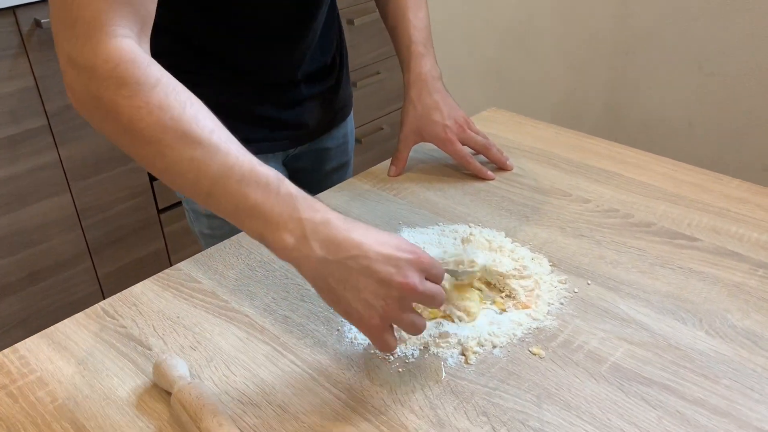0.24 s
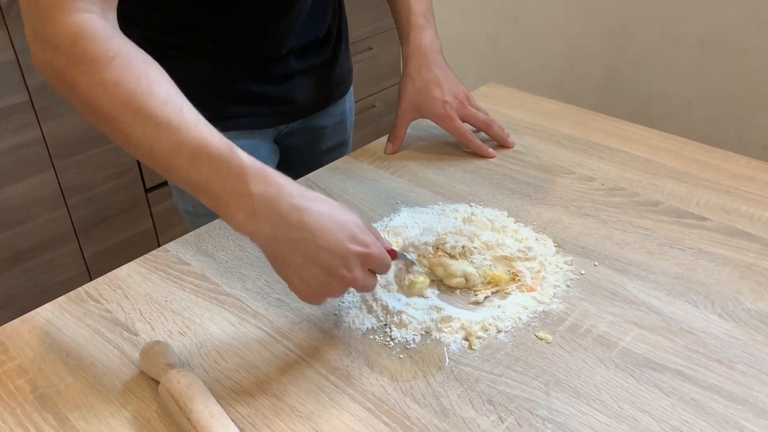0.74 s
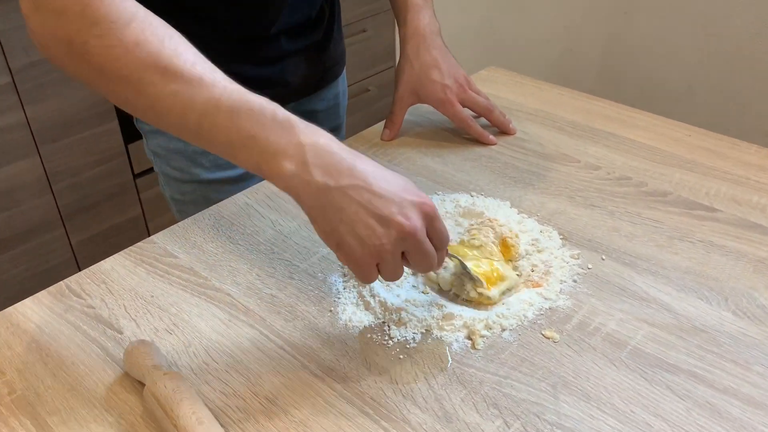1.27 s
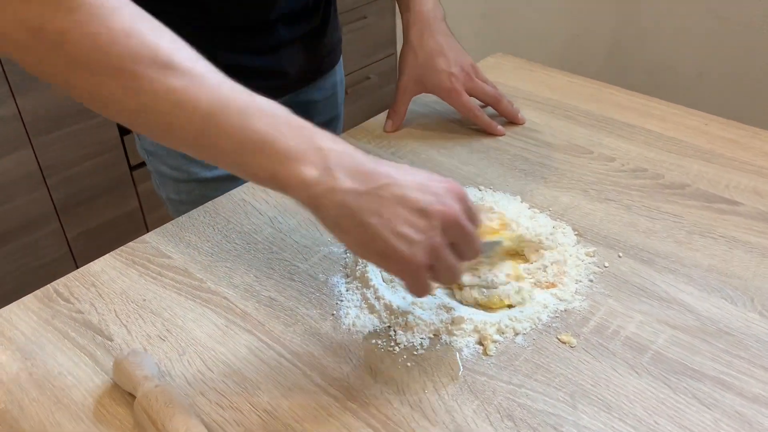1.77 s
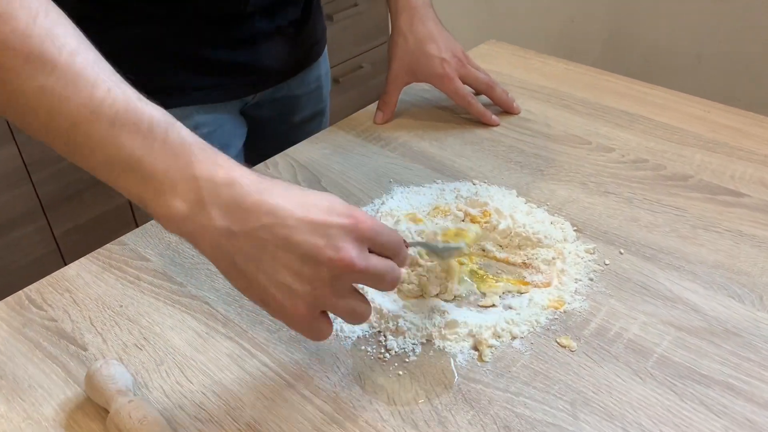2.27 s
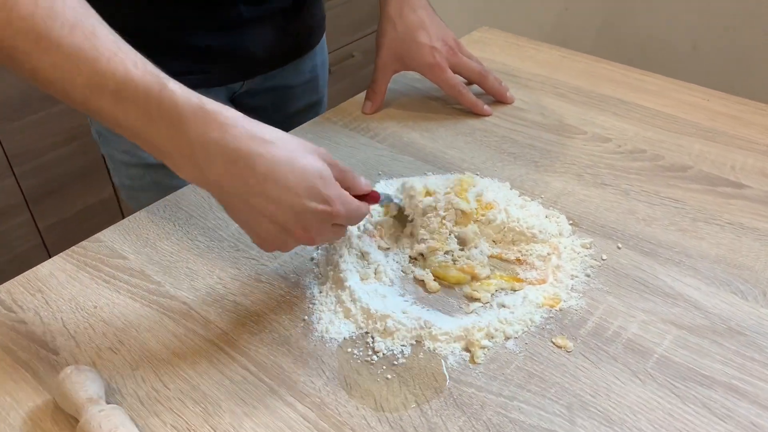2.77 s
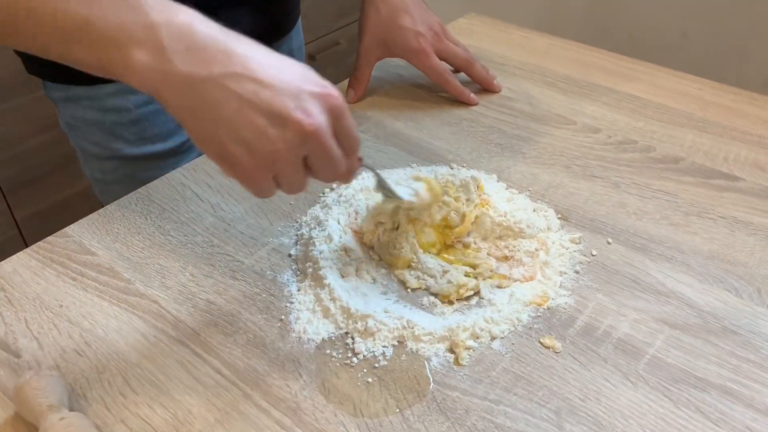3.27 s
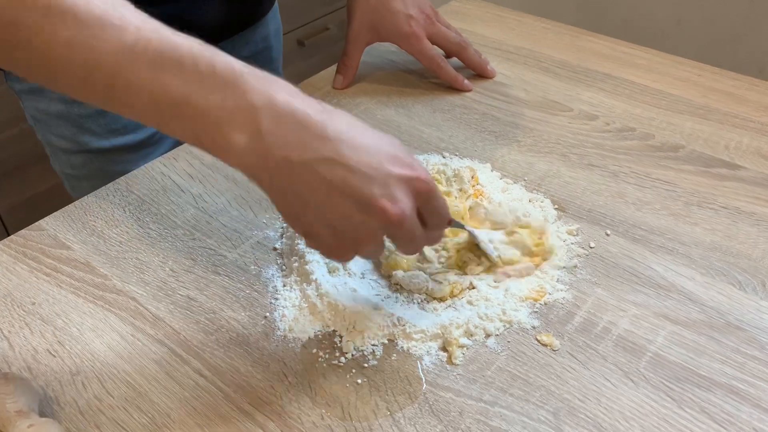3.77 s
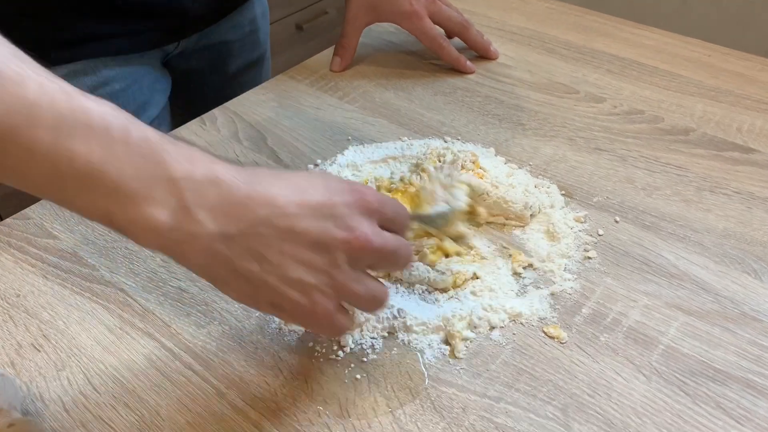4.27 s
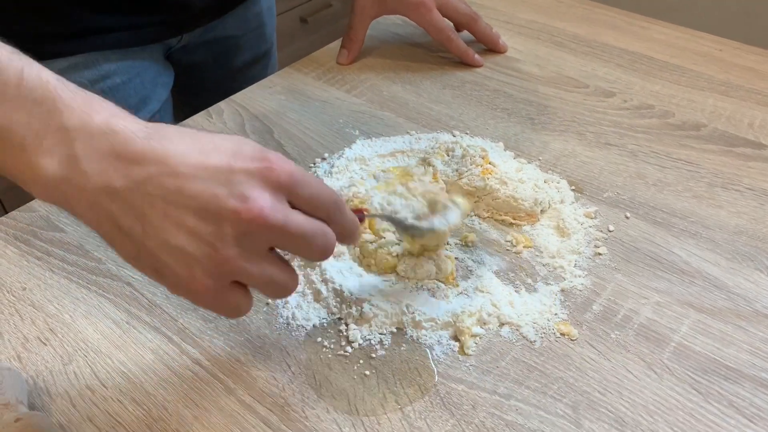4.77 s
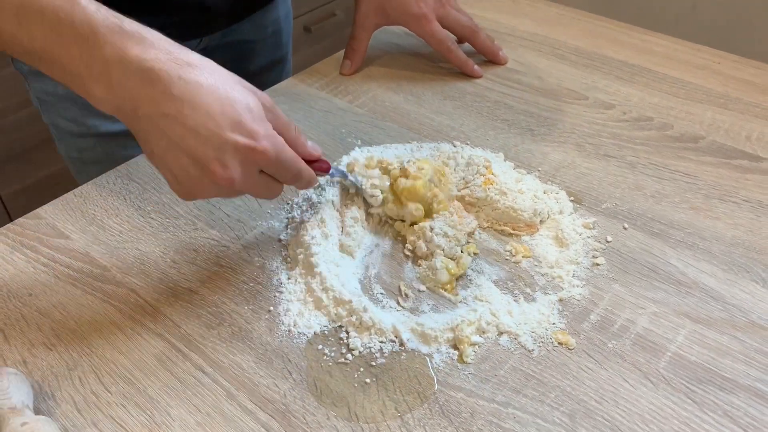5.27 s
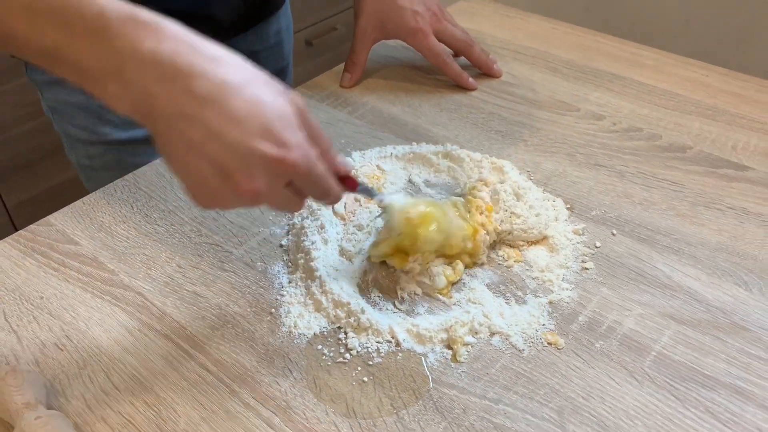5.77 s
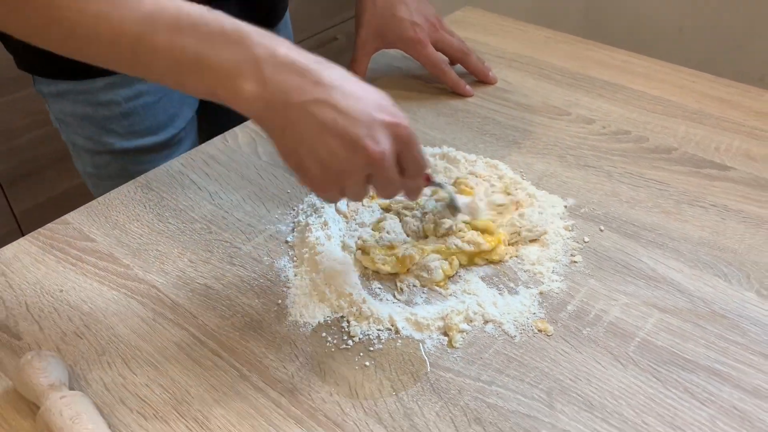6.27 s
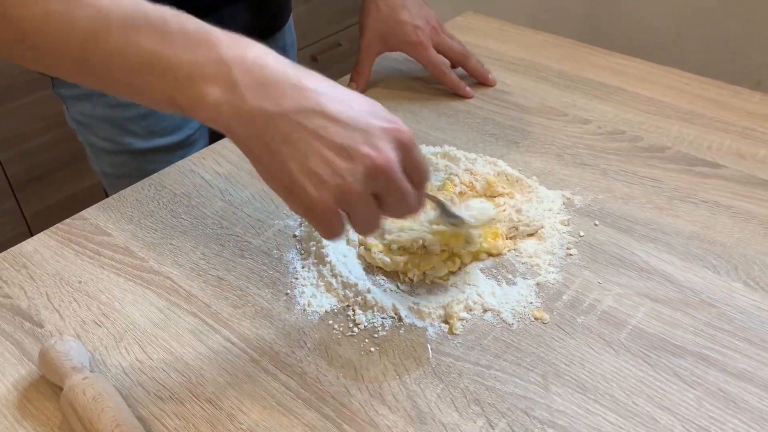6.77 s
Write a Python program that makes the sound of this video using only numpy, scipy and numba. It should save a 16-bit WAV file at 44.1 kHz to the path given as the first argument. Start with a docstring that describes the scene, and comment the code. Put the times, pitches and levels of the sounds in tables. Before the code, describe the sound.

A fork stirs sticky egg and flour on a wooden table, with irregular knocks, gritty scrapes and small wet smacks over low traffic rumble.

```python
"""In a small, bare kitchen a fork stirs eggs into flour on a wooden table.
Most strokes begin with a knock that rings the modes of the table top and the fork's neck, with a short dry crack.
Then the tines drag over gritty wood, or the neck rings on: stick-slip clicks drive rasp, tines, grit and table.
Crumb ticks, smacks, small tine hits and the slosh of sticky dough are shaped noise.
Bands of distant traffic rumble over the hiss of a two-port recorder."""
import sys
import numpy as np
from scipy import signal
from scipy.fft import rfft, irfft, next_fast_len
from scipy.io import wavfile
from scipy.ndimage import uniform_filter1d
from numba import njit

SR = 44100
rng = np.random.default_rng(int(sys.argv[2]) if len(sys.argv) > 2 else 0)


def generate_wav(sig):
    """Save sig (samples, or channels by samples) to the path in sys.argv[1] as 16-bit PCM at SR."""
    pcm = np.round(np.clip(np.atleast_2d(sig).T, -1, 1) * 32767).astype(np.int16)
    wavfile.write(sys.argv[1], SR, pcm)


N = 310287


def from_db(db):
    """Decibel law: level in dB to amplitude gain."""
    return 10 ** (np.asarray(db) / 20)


def rms_one(x):
    """Energy normalisation: scales a signal to unit rms."""
    return x / np.sqrt(np.mean(x ** 2) + 1e-30)


def at_hz(points, hz, axis=1):
    """Logarithmic interpolation: reads one column of a spectrum table on a log frequency axis."""
    points = np.array(points)
    return np.interp(np.log(hz + 1), np.log(points[:, 0]), points[:, axis])


def colour(x, spectrum):
    """Spectral shaping: weights each frequency by a table of relative dB per Hz; rms 1."""
    size = next_fast_len(N)
    gain = from_db(at_hz(spectrum, np.fft.rfftfreq(size, 1 / SR)))
    return rms_one(irfft(rfft(x, size) * gain, size)[..., :N])


def drift(rate):
    """Low-passed noise: two poles at the rate in Hz leave a slow random wander of rms 1."""
    r = np.exp(-2 * np.pi * rate / SR)
    wander = signal.lfilter([1], [1, -2 * r, r * r], rng.standard_normal(N + SR))
    return rms_one(wander[SR:])     # the first second lets the filter settle


def resonance(x, hz, width_hz):
    """Damped resonator: a two-pole band-pass of peak gain 1."""
    r = np.exp(-np.pi * width_hz / SR)
    poles = [1, -2 * r * np.cos(2 * np.pi * hz / SR), r * r]
    return signal.lfilter([(1 - r * r) / 2, 0, (r * r - 1) / 2], poles, x)


@njit
def gliding(x, cosine, r):
    """Time-varying resonator: a two-pole band-pass whose centre moves."""
    y = np.zeros(len(x))
    for i in range(2, len(x)):
        y[i] = x[i] - x[i - 2] + 2 * r * cosine[i] * y[i - 1] - r * r * y[i - 2]
    return y


def moving_band(x, hz, width_hz):
    """Cascaded resonance: two passes through a gliding resonator steepen the band; rms 1."""
    cosine = np.cos(2 * np.pi * hz / SR)
    r = np.exp(-np.pi * width_hz / SR)
    return rms_one(gliding(gliding(x, cosine, r), cosine, r))


def ring(clicks, hz, t60):
    """Modal impulse response: a unit click starts a decaying sine of height 1."""
    r, w = from_db(-60 / (t60 * SR)), 2 * np.pi * hz / SR
    return signal.lfilter([0, np.sin(w)], [1, -2 * r * np.cos(w), r * r], clicks + 1e-18)


def clicks_at(per_s, spread_db):
    """Random point process: clicks of either sign and uneven size at an average rate per second."""
    sizes = from_db(spread_db * np.minimum(rng.exponential(1, N), 5)) * rng.choice([-1, 1], N)
    return sizes * (rng.random(N) < per_s / SR)


# Likeness of the two ports in the diffuse sound. Each row: frequency in Hz, left-right correlation.
PORT_LIKENESS = [(60, 1), (300, 0.8), (700, 0.36), (1200, 0.012), (5000, .05), (6300, 0.16), (8500, 1),
                 (15000, 0.95)]


def alike_pair(mid, side, hz):
    """Partial coherence: a shared and an opposed part make left and right of a given correlation."""
    alike = np.clip(at_hz(PORT_LIKENESS, hz), 0, 1)
    return np.sqrt((1 + alike) / 2) * mid + np.sqrt((1 - alike) / 2) * side * [[1], [-1]]


# Still room and recorder hiss. Each row: frequency in Hz, relative level in dB per Hz.
FLOOR_SPECTRUM = [(25, -54), (40, 6), (60, -2), (100, -12.5), (200, -7.5), (500, -17), (1500, -25.5),
                  (2500, -33.5), (5000, -40.5), (8000, -35), (11500, -32.5), (12500, -39.5), (15800, -39)]
# Slow swells of traffic. Each row: time in seconds, deep rumble in dB, drone in dB.
TRAFFIC_SWELLS = [(0.0, -71, -78), (0.33, -59.5, -68), (1.61, -66.5, -80.5), (1.96, -61, -65.5),
                  (2.14, -64.5, -71), (3.12, -60, -71), (3.45, -58.5, -61.5), (4.31, -58, -66.5),
                  (4.43, -52.5, -81), (4.98, -59, -62), (5.25, -59, -65.5), (5.66, -63.5, -70),
                  (6.541, -63, -73), (6.88, -67.5, -74.5), (7.04, -61, -57)]
FLOOR_DB = -67
DEEP_HZ, DRONE_HZ = (73, 45), (138.6, 20.6)     # centre, width of each filter pass


def background():
    """Diffuse-field noise: a steady coloured floor, two swelling bands of traffic and house noise."""
    s, deep_db, drone_db = np.transpose(TRAFFIC_SWELLS)
    t, white = np.arange(N) / SR, rng.standard_normal((3, 2, N))
    out = from_db(FLOOR_DB) * colour(white[0], FLOOR_SPECTRUM)
    for noise, db, (hz, width_hz) in zip(white[1:], (deep_db, drone_db), (DEEP_HZ, DRONE_HZ)):
        band = resonance(resonance(noise, hz, width_hz), hz, width_hz)
        out += from_db(np.interp(t, s, db)) * rms_one(band)
    house = resonance(rng.standard_normal((2, N)), 490.0, 1200.)     # muffled house noise comes and goes
    out += from_db(-82 + 3.5 * drift(3.1)) * rms_one(house)
    size = next_fast_len(N)
    mid, side = rfft(out, size)
    return irfft(alike_pair(mid, side, np.fft.rfftfreq(size, 1 / SR)), size)[:, :N]


# Swells of a faint narrow hiss. Each row: start in seconds, end in seconds, peak level in dB.
WHEEZE_SWELLS = [(1.158, 1.453, -81), (1.55, 1.7, -83.5)]
WHEEZE_HZ = (2600, 248)     # centre, width of each filter pass


def wheeze():
    """Amplitude modulation: half-sine swells open and close a narrow band of noise."""
    t, hiss = np.arange(N) / SR, rng.standard_normal(N)
    swell = 0
    for start, end, db in WHEEZE_SWELLS:
        swell = swell + from_db(db) * np.sin(np.pi * np.clip((t - start) / (end - start), 0, 1))
    return swell * rms_one(resonance(resonance(hiss, *WHEEZE_HZ), *WHEEZE_HZ))


# The fork turns the soft paste over.
# Each row: time of the peak in seconds, slosh peak in dB, flour rustle peak in dB.
PASTE_TURNS = [(0.7, -89, -83), (1.25, -94, -83), (3.052, -71.5, -93), (3.29, -79, -104),
               (3.437, -71.5, -101), (3.87, -94, -77.5), (4.084, -75, -109), (4.17, -94, -87),
               (5.65, -81.5, -99), (5.971, -81, -78), (6.87, -88.5, -102.5)]
STIR_RISE_DB_PER_S, STIR_FALL_DB_PER_S, STIR_REST_DB = 220, 139, -92.5


def stir():
    """Granular excitation: sparse clicks give a lumpy slosh, denser ones a rustle of flour."""
    t, gains = np.arange(N) / SR, from_db(STIR_REST_DB)
    for s, *peak_db in PASTE_TURNS:
        loss_db = np.maximum(STIR_RISE_DB_PER_S * (s - t), STIR_FALL_DB_PER_S * (t - s))
        gains = gains + np.outer(from_db(peak_db), from_db(-loss_db))
    slosh = resonance(clicks_at(900., 0.7), 1060.0, 710.0)
    rustle = resonance(clicks_at(2500., 5.1), 2400.0, 2500.)
    return gains[0] * rms_one(slosh) + gains[1] * rms_one(rustle)


PUFF_RISE_SHARE = 0.075     # rise time constant as a share of t60


def puffs(events, sharpness, t60):
    """Transient band noise: each event is a dying puff in a band whose width is centre / sharpness."""
    out, age = np.zeros(N), np.arange(2000) / SR
    rise = 1 - np.exp(-age / (PUFF_RISE_SHARE * t60))
    for (s, level_db, hz), noise in zip(events, rng.standard_normal((len(events), 2000))):
        band = resonance(resonance(noise, hz, hz / sharpness), hz, hz / sharpness)
        start = round(s * SR)
        out[start:start + 2000] += rms_one(band) * from_db(level_db - 60 * age / t60) * rise
    return out


# The three tables below share their columns; levels are before the rise and decay.
# Lumps of paste flop over. Each row: start in seconds, level in dB, centre in Hz.
PASTE_LUMPS = [(0.976, -71, 400), (1.044, -63, 1080), (3.166, -63, 430), (4.069, -58, 580),
               (5.859, -57, 340), (6.759, -60, 415)]
# Dry crumbs tick. Each row: start in seconds, level in dB, centre in Hz.
CRUMB_TICKS = [(0.19, -65, 11200), (1.0744, -65, 11800), (1.263, -44, 11600), (1.3435, -49, 10900),
               (3.2051, -60, 10700), (3.436, -49.5, 7100), (3.5367, -58, 11300), (3.7579, -63, 11200),
               (4.4302, -37.5, 11700), (4.4594, -62, 10300), (5.6077, -55, 6070), (5.964, -56, 9900),
               (6.024, -63, 11400), (6.2856, -59, 9950), (6.321, -57.5, 11000), (6.6052, -70, 6440)]
# Short mid-pitched smacks and tine hits. Each row: start in seconds, level in dB, centre in Hz.
SHORT_SMACKS = [(3.047, -50.5, 1110), (3.0694, -55, 1050), (3.2056, -50, 2830), (3.2675, -49, 1920),
                (3.2999, -55, 2000), (3.4336, -39, 1830), (3.4421, -39.5, 1750), (3.5044, -51.5, 1950),
                (3.7968, -53.5, 1310), (3.8975, -35, 2750), (3.9015, -53, 1910), (4.2194, -36.5, 1100),
                (5.6094, -80, 2020), (6.0038, -58.5, 2430), (6.0644, -54, 1220)]
TICK_T60_S, SMACK_T60_S, LUMP_T60_S = 0.017, 0.017, 0.11


def small_sounds():
    """Superposition: lumps, crumbs, short smacks and tine hits add to the slosh of the paste."""
    lumps = puffs(PASTE_LUMPS, 1.5, LUMP_T60_S)
    crumbs = puffs(CRUMB_TICKS, 1.0, TICK_T60_S)
    smacks = puffs(SHORT_SMACKS, 1.38, SMACK_T60_S)
    return smacks + crumbs + lumps + stir()


# Tines land on the table. Each row: time in seconds, thump level in dB, hardness in dB per octave
# about 300 Hz, relative fork ring in dB, crack onset level in dB.
TINE_LANDINGS = [(0.129, -38.5, 1.5, -55, -40.5), (1.733, -26, 6, -50, -43), (2.112, -44, -3, -42, -41),
                 (2.432, -36.5, 0.5, -50.5, -42), (4.196, -45, 3.5, -52, -40),
                 (4.554, -29.5, 5, -95, -43.5), (4.925, -42.5, -7.5, -50, -43),
                 (6.908, -27, 0.5, -34.5, -58)]
# Modes of the table top, the upper ones also rubbed by the fork.
# Each row: frequency in Hz, relative level in dB, free decay t60 in seconds.
TABLE_MODES = [(74, -1.5, 0.32), (127, -2, 0.49), (167.5, 6, 0.31), (216, 5, 0.11), (270.8, -0.5, 0.092),
               (329.6, 4, 0.27), (397, -7.5, 0.084), (432.4, -6, 0.14), (550, -4, 0.089), (650, -13, 0.073),
               (704, -13, 0.12), (840, -15, 0.081), (942, -10, 0.13), (1140, -30.5, 0.09),
               (1250, -24, 0.039), (1704, -27, 0.069)]
# Modes of the fork's neck, also shaken by the rasp.
# Each row: frequency in Hz, relative level in dB, t60 in seconds.
NECK_MODES = [(1394, -1, 0.35), (1397, -7.5, 0.14), (1550, -2.5, 0.48)]
WAVE_START_HZ, WAVE_SAG_S, WAVE_RISE_S, WAVE_T60_S = 400.4, 0.0218, .003, 0.089
WAVE_DB, MODES_DB = 2, -13.5     # bending wave and table modes against the thump level
CRACK_T60_S = 0.0035


def knocks():
    """Modal excitation by impact: a soft blow rings table and neck, with a dry crack of the steel."""
    s, thump_db, hardness, fork_db, crack_db = np.transpose(TINE_LANDINGS)
    at, out = np.round(s * SR).astype(int), np.zeros(N)
    scatter = rng.normal(0, 1, (len(at), len(TABLE_MODES) + len(NECK_MODES)))
    for k, (hz, level_db, t60) in enumerate(TABLE_MODES):
        clicks = np.zeros(N)
        late = round(SR * 0.06 / np.sqrt(hz))     # low bending waves travel slower
        strike_db = thump_db + level_db + MODES_DB + hardness * np.log2(hz / 300)
        clicks[at + late] = from_db(strike_db + 2 * scatter[:, k])
        out += ring(clicks, hz, t60) * (-1) ** k
    for k, (hz, level_db, t60) in enumerate(NECK_MODES):
        clicks = np.zeros(N)
        clicks[at] = from_db(fork_db + level_db - 3.5 + 3.9 * scatter[:, -1 - k])
        out += ring(clicks, hz, t60)
    out = signal.lfilter(np.hanning(26) / 13, [1], out)     # flour cushions the contact

    # the first bending wave sweeps past, falling in pitch
    age = np.arange(2000) / SR
    turns = WAVE_START_HZ * WAVE_SAG_S * age / (age + WAVE_SAG_S)
    envelope = (1 - np.exp(-age / WAVE_RISE_S)) * from_db(WAVE_DB - 60 * age / WAVE_T60_S)
    wave = np.sin(2 * np.pi * turns) * envelope
    for i, db in zip(at, thump_db):
        out[i:i + 2000] += from_db(db) * wave

    age = np.arange(800) / SR
    for i, db, noise in zip(at, crack_db, rng.standard_normal((len(at), 800))):
        out[i:i + 800] += from_db(db - 60 * age / CRACK_T60_S) * noise
    return out


# Fork strokes, one curve each; after some knocks the end is the ringing neck.
# Each row: time in seconds, rasp level in dB, flour grit above the rasp in dB.
FORK_STROKES = [
    [(0.131, -59, -1), (0.143, -57, -8), (0.169, -72, -9), (0.179, -66, -15), (0.193, -65, -4),
     (0.2, -78, -23)],
    [(0.425, -72, -7), (0.461, -47, 3.5), (0.509, -50.5, 1), (0.529, -42, -2.5), (0.539, -50, 0.5),
     (0.64, -61, -4.5)],
    [(1.733, -51.5, -11), (1.769, -54, 0), (1.803, -46, 4.5), (1.821, -50, -18), (1.875, -92, 6),
     (1.89, -69, -3)],
    [(2.113, -48.5, -10), (2.119, -51.5, 3.5), (2.159, -56.5, -11), (2.173, -70, 10), (2.185, -64, -19),
     (2.195, -71, -3), (2.2, -68, -13)],
    [(2.433, -57.5, 8), (2.519, -37, -5), (2.657, -52, -2), (2.679, -38.5, -17.5), (2.711, -67, 6),
     (2.761, -52.5, -5.5), (2.78, -64, -30)],
    [(3.893, -56, -1), (3.903, -38, -13.5), (3.93, -56, -18)],
    [(4.19, -60, 6.5), (4.218, -58, 18.5), (4.23, -59, 7.5), (4.32, -68.5, -2)],
    [(4.556, -50.5, 2), (4.616, -52, 13), (4.63, -51, 11), (4.642, -44, 6), (4.66, -40, -3.5),
     (4.682, -59.5, -12), (4.75, -66, -1)],
    [(4.927, -54, -10), (4.955, -49, 1), (4.965, -59.5, 16), (4.973, -40.5, -4), (5.119, -52, 1),
     (5.155, -49, 1), (5.22, -57, -15)],
    [(5.25, -64, -24), (5.288, -53, -7), (5.338, -61, 2), (5.398, -42.5, -8.5), (5.42, -41, 7),
     (5.484, -38.5, -12), (5.488, -40, -6)],
    [(6.907, -51, 2), (6.911, -50, 3), (6.933, -45, 7.5), (6.941, -63, -20), (6.951, -55, -21),
     (7.03, -75, -3)],
]
# How the fork is held in each stroke. Each row: rasp centre at the start in Hz, at the end in Hz,
# tine scratch above the rasp in dB, table rub in dB; the last two hold at the usual rasp, even grit.
FORK_GRIPS = [(1270, 960, -2, -62.5), (1910, 2460, -6.5, -62.5), (1580, 1170, -4.5, -51),
              (1450, 1100, -3.5, -59.5), (2140, 2390, -6, -65.5), (2500, 1930, -25, -74),
              (1150, 2100, -1.5, -59), (1520, 1750, -4, -68), (1930, 2650, -3.5, -65.5),
              (2480, 1940, -5.5, -57), (1520, 1390, -10, -56)]
TINES_GAIN_ON_RASP = 0.35     # dB per dB: loud rasps bring the tines out
TINES_FOLLOW_GRIT, RUB_FOLLOWS_RASP = 0.53, 0.51     # dB per dB
USUAL_RASP_DB = -49


def stroke_curves():
    """Piecewise-linear control: levels of rasp, tines, grit, rub and the rasp's centre, stroke by stroke."""
    t = np.arange(N) / SR
    # rows: rasp dB, rasp centre Hz, tines dB, grit dB, rub dB; near silence between strokes
    out = np.outer([-120, 2000, -120, -120, -120], np.ones(N))
    for rows, (start_hz, end_hz, tine_db, rub_db) in zip(FORK_STROKES, FORK_GRIPS):
        s, rasp_db, grit_db = np.transpose(rows)
        centre_hz = np.interp(s, s[[0, -1]], [start_hz, end_hz])
        excess_db = rasp_db - USUAL_RASP_DB
        tines = rasp_db + tine_db + TINES_FOLLOW_GRIT * grit_db + TINES_GAIN_ON_RASP * excess_db
        columns = [rasp_db, centre_hz, tines, rasp_db + grit_db, rub_db + RUB_FOLLOWS_RASP * excess_db]
        inside = slice(round(s[0] * SR), round(s[-1] * SR))
        out[:, inside] = [np.interp(t[inside], s, c) for c in columns]
    return out


# Modes of the tines. Each row: frequency in Hz, relative level in dB, t60 in seconds.
TINE_MODES = [(1770, 2, 0.033), (2070, 5, 0.01), (2220, -3, 0.025), (2477, 2, 0.017), (3000, -8, 0.0043),
              (3410, 0.5, 0.051), (3823, 22.5, 0.0042), (4100, -3, 0.036), (4680, 14.5, 0.0064)]
# Spectrum of flour grit. Each row: frequency in Hz, relative level in dB per Hz.
GRIT_SPECTRUM = [(4500, -27.5), (5600, -13.5), (6600, 0.5), (8000, -4), (10000, -4.5), (11600, -9),
                 (13000, -13.5), (15500, -22)]
NECK_DRIVE_DB = -53     # how strongly the rasp shakes the neck


def strokes():
    """Stick-slip friction: dense uneven clicks drive rasp, tines, grit and table, and the neck's ring."""
    rasp_db, rasp_hz, tine_db, grit_db, rub_db = stroke_curves()
    judder = 1.62 * drift(92)     # the whole fork catches and skips, each part also on its own
    slips = []
    for per_s in (2935.0, 3670.0, 8810.0, 8010.0):
        slips.append(clicks_at(per_s, 2.42) * from_db(judder + 2.87 * drift(18.3)))
    rasp_slips, tine_slips, grit_slips, rub_slips = slips
    rasp = moving_band(rasp_slips, rasp_hz * from_db(.35 * drift(30)), 1150.)

    # the tines sing unevenly as the contact shifts; the low modes speak where the rasp passes over them
    low, high = 0, 0
    for hz, db, t60 in TINE_MODES:
        touch = from_db(db + 2.5 * drift(20))
        if hz < 2800:
            low = low + ring(from_db(rasp_db) * rasp * touch, hz, t60) * from_db(-38.5)
        else:
            high = high + ring(tine_slips * touch, hz, t60)
    for hz, db, t60 in NECK_MODES:
        low = low + ring(from_db(rasp_db + db + NECK_DRIVE_DB) * rasp, hz, t60)

    # rubbing damps the table and drives its upper modes alike
    rub = 0
    for k, (hz, _, t60) in enumerate(TABLE_MODES[5:-2]):
        rub = rub + ring(rub_slips, hz, 0.65 * t60) * (-1) ** k
    gains = from_db([rasp_db, tine_db, grit_db, rub_db])
    gains = uniform_filter1d(gains, size=200)     # contact builds over about 4 ms
    parts = [rasp, rms_one(high), colour(grit_slips, GRIT_SPECTRUM), rms_one(rub)]
    return low + np.sum(gains * parts, axis=0)


# Reverberation of the kitchen. Each row: frequency in Hz, t60 in seconds, tail level in dB.
KITCHEN_TAIL = [(103, 0.24, -11.5), (300, 0.41, 0), (1340, 0.42, -4.5), (3480, 0.57, -10.5),
                (6530, 0.096, 0), (14300, 0.29, -15)]


def kitchen(x):
    """Reverberation: direct sound plus a noise tail dying by octave, partly its own at each port."""
    length = SR // 2
    age, tails = np.arange(length) / SR, 0
    for low in 50 * 2. ** np.arange(0, 8.4, 1):
        centre = np.sqrt(2) * low
        band = signal.butter(2, [low, min(2 * low, .45 * SR)], "band", fs=SR, output="sos")
        decay = from_db(-60 * age / at_hz(KITCHEN_TAIL, centre))
        onset = np.clip(age / 0.004, 0, 1)
        tail = signal.sosfilt(band, rng.standard_normal((2, length))) * decay * onset
        tail_gain = from_db(at_hz(KITCHEN_TAIL, centre, axis=2))
        tails = tails + tail_gain * tail / np.sqrt(np.sum(decay ** 2))
    size = next_fast_len(N + length)
    mid, side = rfft(tails, size)
    response = 1 + alike_pair(mid, side, np.fft.rfftfreq(size, 1 / SR))
    return irfft(rfft(x, size) * response, size)[:, :N]


def scene():
    """Linear superposition: fork, small sounds and wheeze share the room; the background is added."""
    return kitchen(knocks() + strokes() + small_sounds() + wheeze()) + background()


# Level difference of the ports. Each row: frequency in Hz, left minus right in dB.
PORT_LEAN = [(60, -3), (300, 0.5), (1200, 1), (2400, 2.5), (4500, -1), (6500, -1), (15000, 1)]
# Phase difference of the ports, one full turn every 4.9 kHz in the treble.
# Each row: frequency in Hz, lead of the right port in radians.
PORT_LEAD = [(0, -0.57), (500, 0.49), (1700, 1.88), (6150, 0.87), (8570, np.pi), (11000, 2 * np.pi),
             (13430, 3 * np.pi), (15800, 4 * np.pi)]
STOPBAND_HZ = 15800 * 1.03     # from here up the treble is 60 dB down


def record(dry):
    """Two-port reception: ports differ in level and phase by frequency; bottom and top are cut."""
    size = next_fast_len(N + 2000)
    hz = np.fft.rfftfreq(size, 1 / SR)
    # the left port takes half of each difference, the right port the opposite half
    half = from_db(at_hz(PORT_LEAN, hz) / 2) * np.exp(-.5j * np.interp(hz, *np.transpose(PORT_LEAD)))
    ports = irfft(rfft(dry, size) * [half, 1 / half], size)[:, :N]
    ports = signal.sosfilt(signal.butter(2, 45., "high", fs=SR, output="sos"), ports)
    return signal.sosfilt(signal.cheby2(16, 60, STOPBAND_HZ, fs=SR, output="sos"), ports)


dry = scene()
out = record(dry)
generate_wav(out)
```